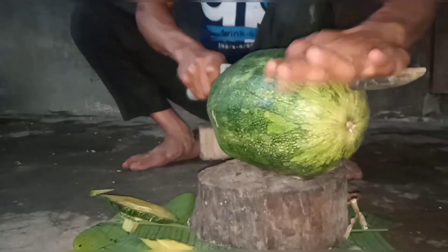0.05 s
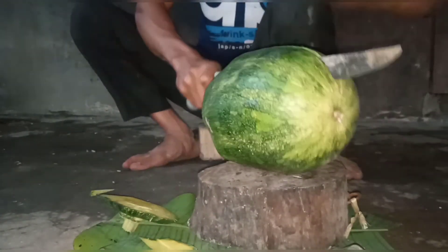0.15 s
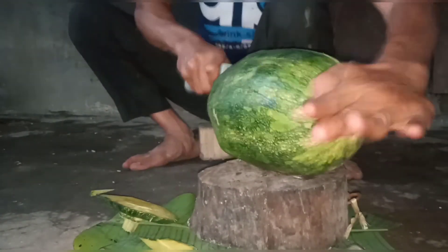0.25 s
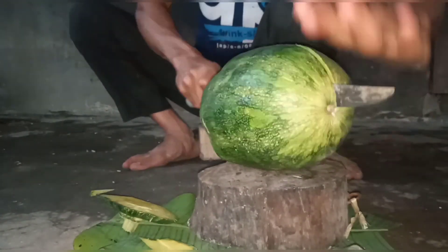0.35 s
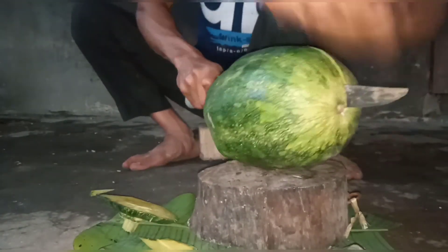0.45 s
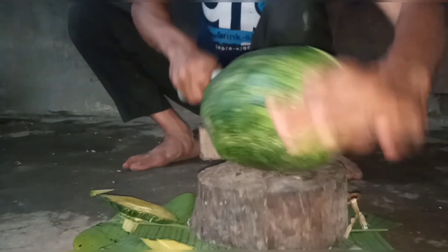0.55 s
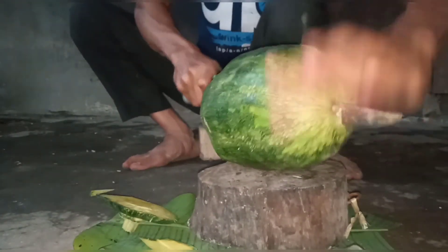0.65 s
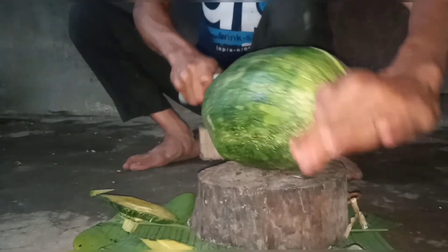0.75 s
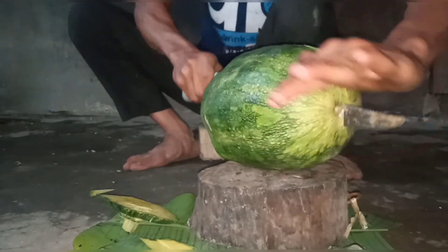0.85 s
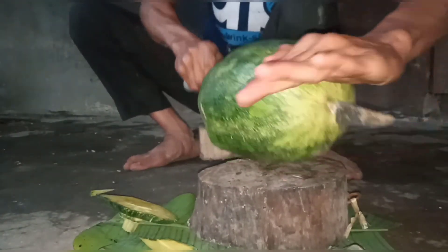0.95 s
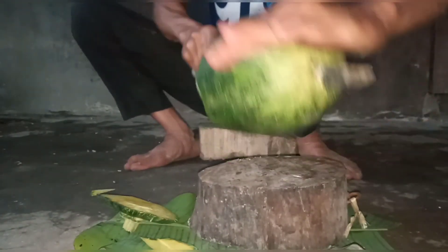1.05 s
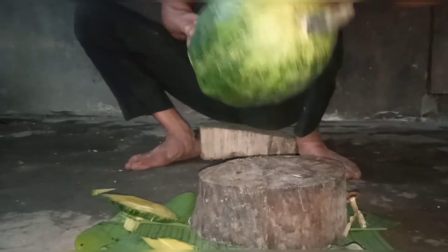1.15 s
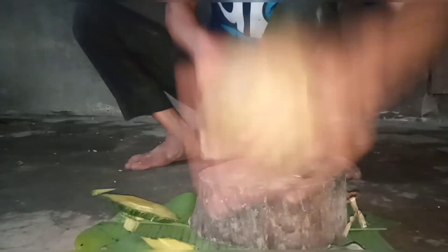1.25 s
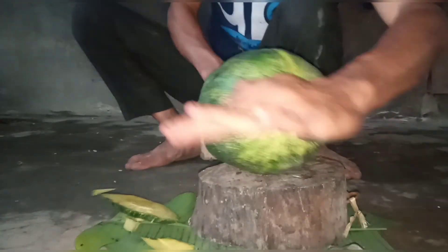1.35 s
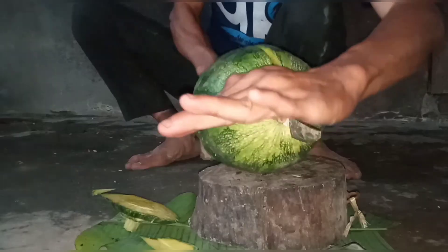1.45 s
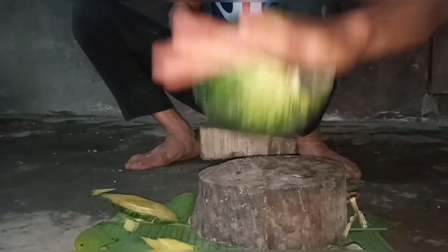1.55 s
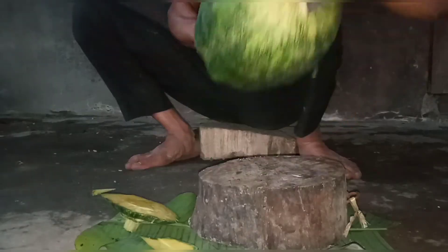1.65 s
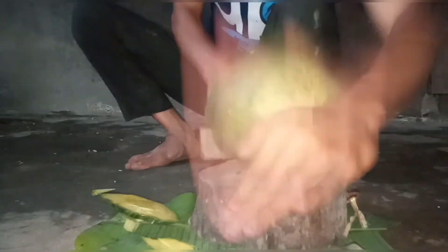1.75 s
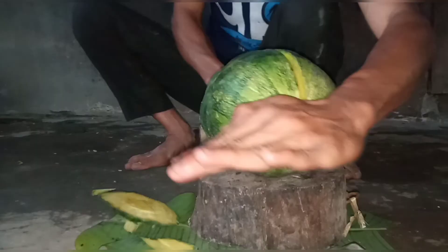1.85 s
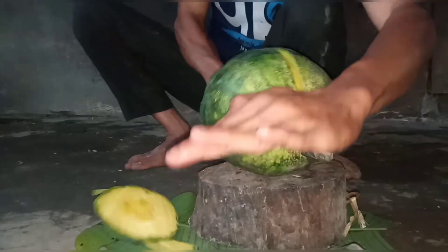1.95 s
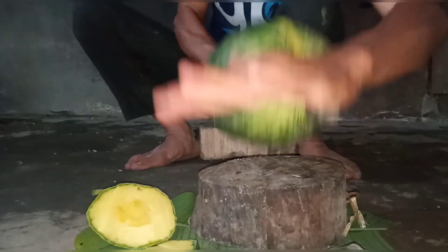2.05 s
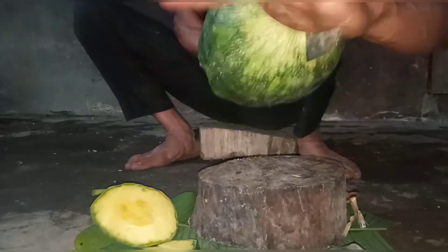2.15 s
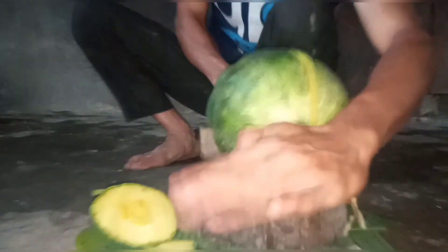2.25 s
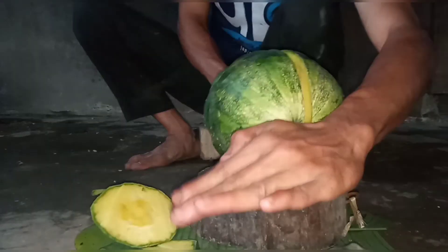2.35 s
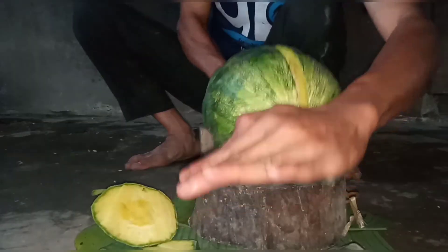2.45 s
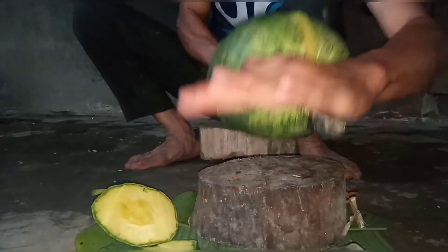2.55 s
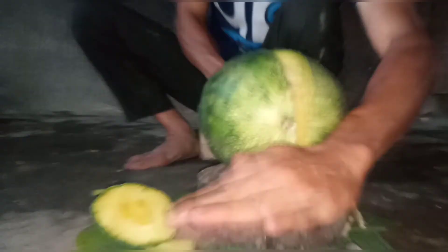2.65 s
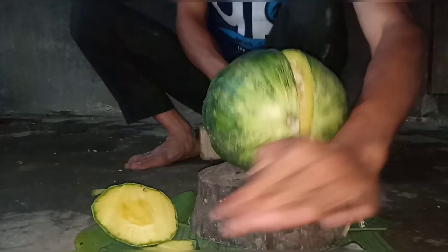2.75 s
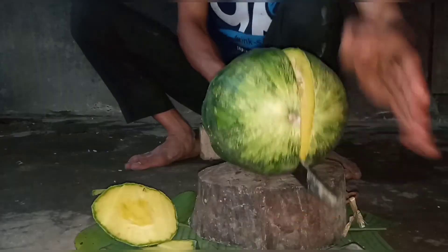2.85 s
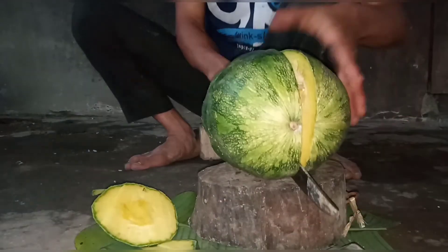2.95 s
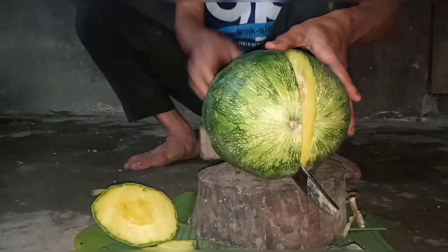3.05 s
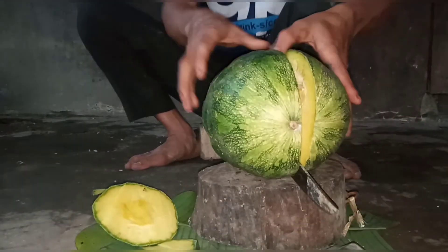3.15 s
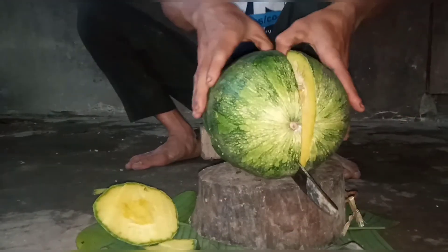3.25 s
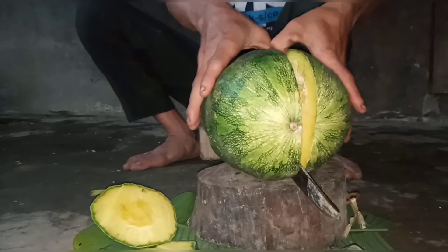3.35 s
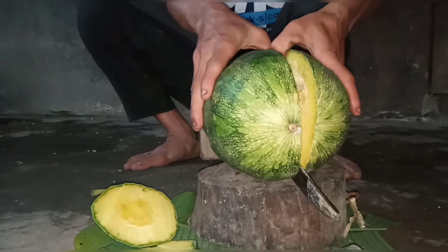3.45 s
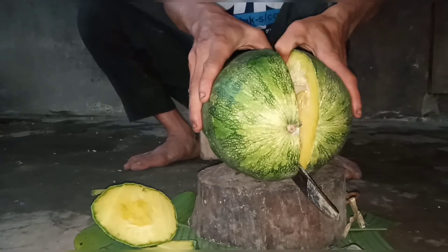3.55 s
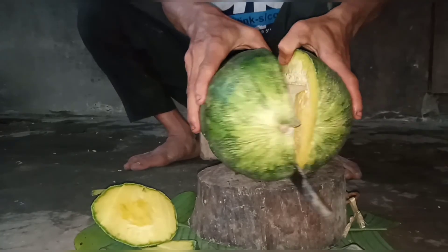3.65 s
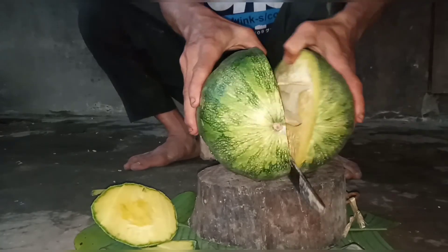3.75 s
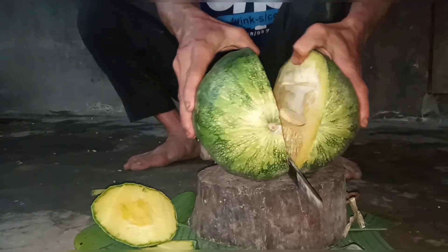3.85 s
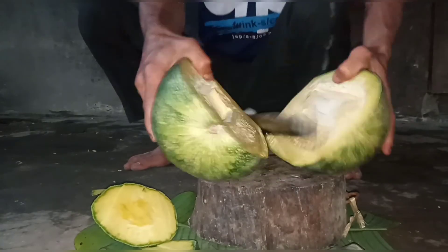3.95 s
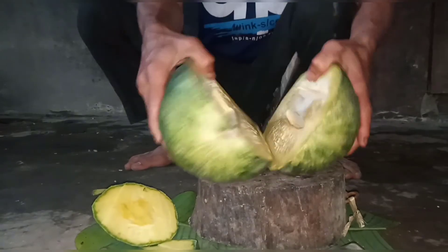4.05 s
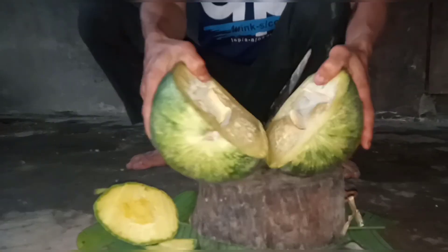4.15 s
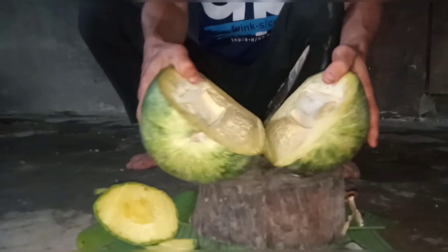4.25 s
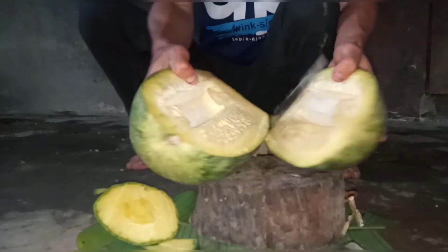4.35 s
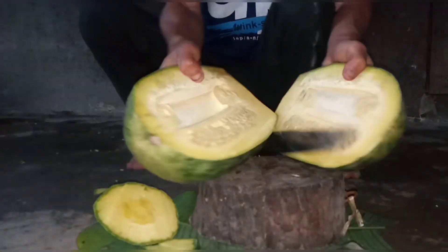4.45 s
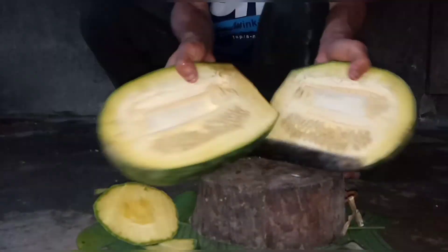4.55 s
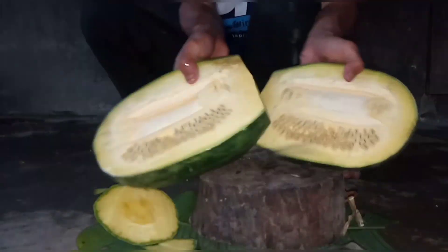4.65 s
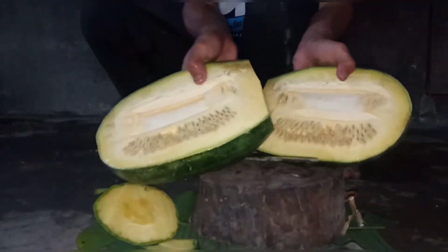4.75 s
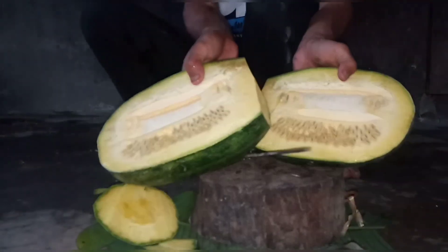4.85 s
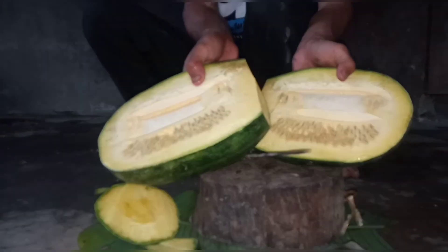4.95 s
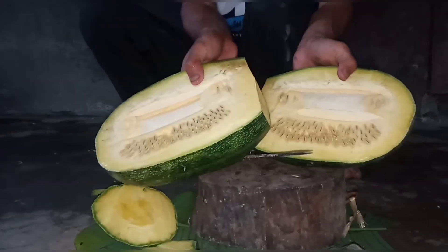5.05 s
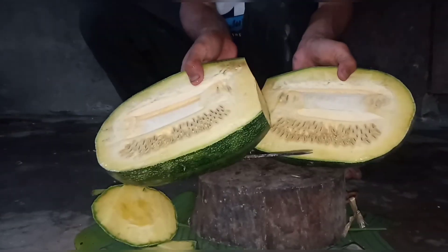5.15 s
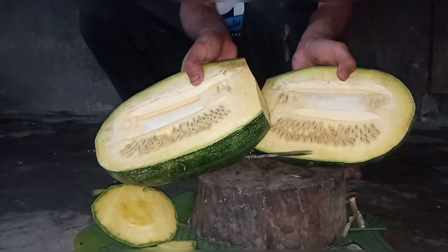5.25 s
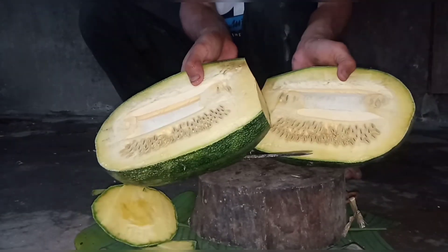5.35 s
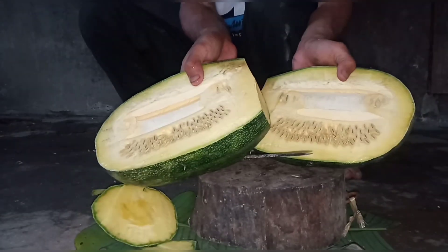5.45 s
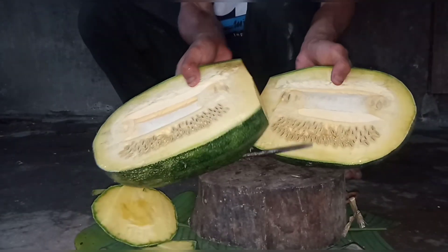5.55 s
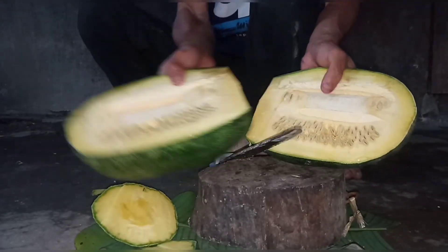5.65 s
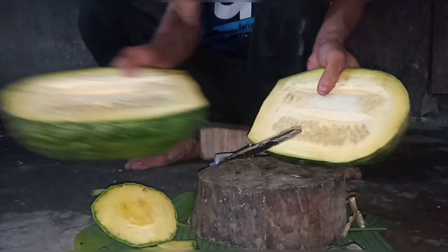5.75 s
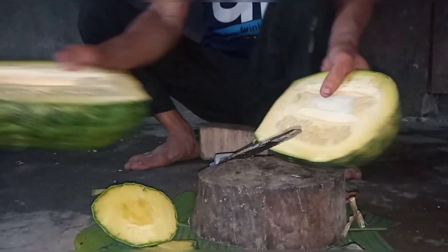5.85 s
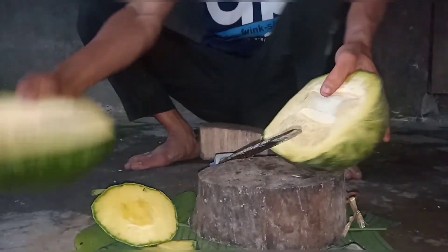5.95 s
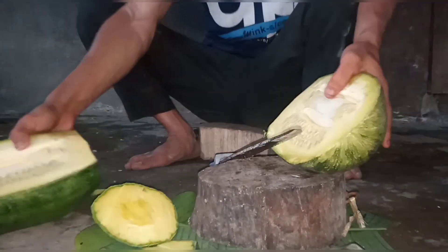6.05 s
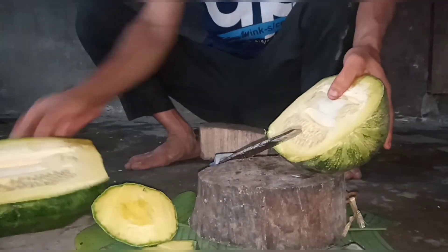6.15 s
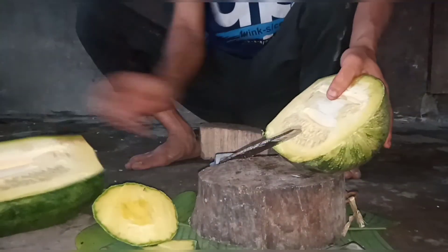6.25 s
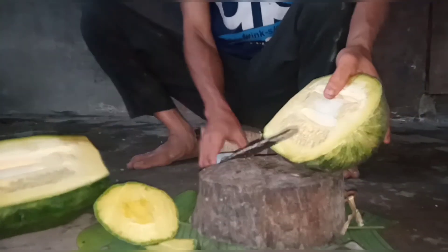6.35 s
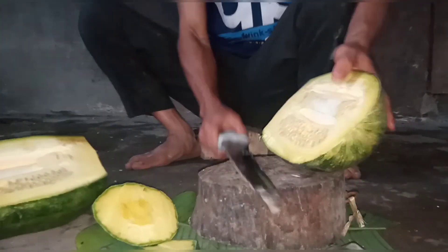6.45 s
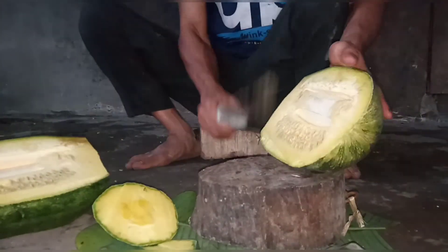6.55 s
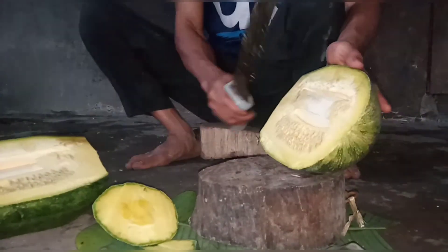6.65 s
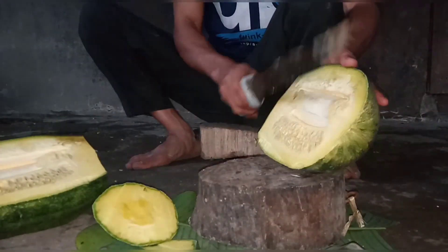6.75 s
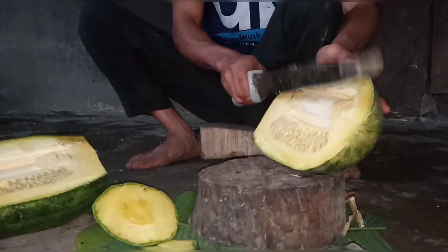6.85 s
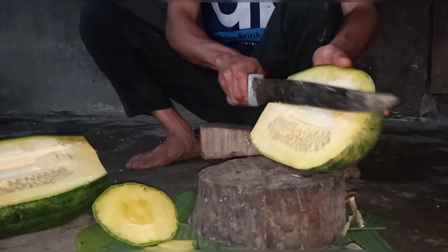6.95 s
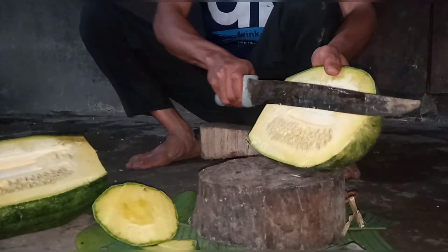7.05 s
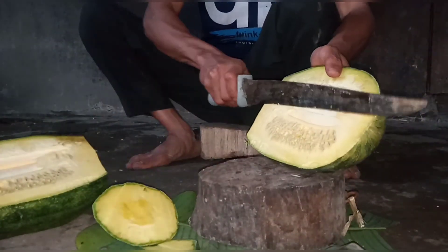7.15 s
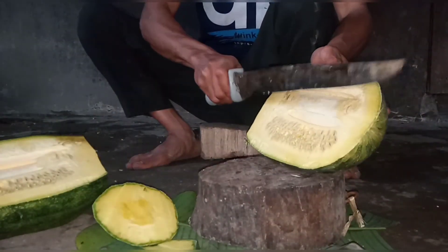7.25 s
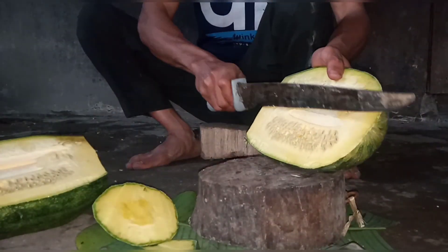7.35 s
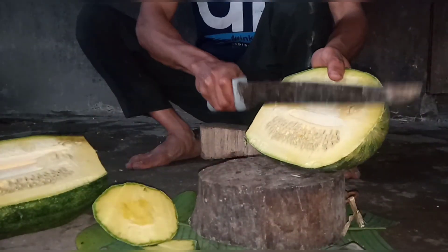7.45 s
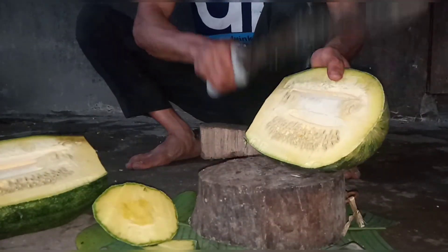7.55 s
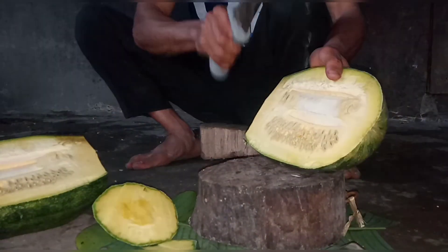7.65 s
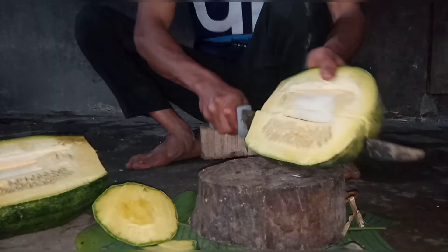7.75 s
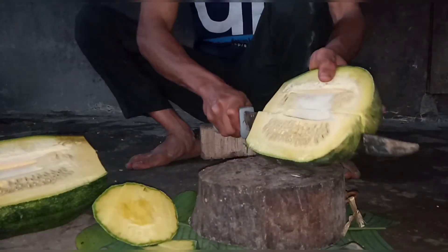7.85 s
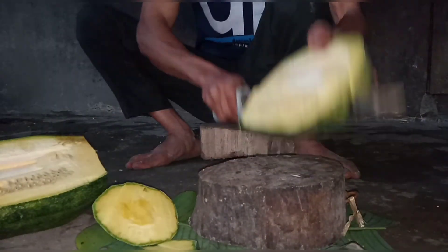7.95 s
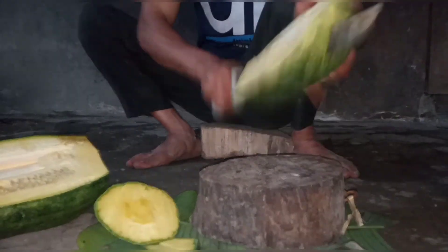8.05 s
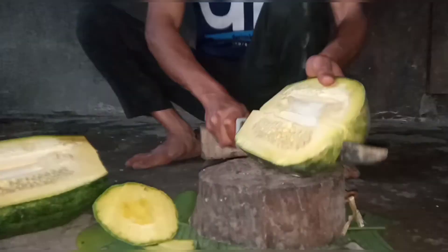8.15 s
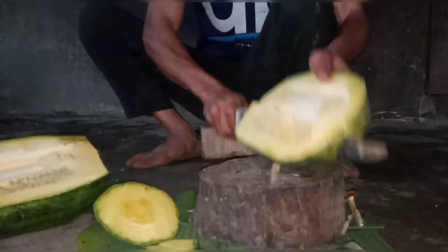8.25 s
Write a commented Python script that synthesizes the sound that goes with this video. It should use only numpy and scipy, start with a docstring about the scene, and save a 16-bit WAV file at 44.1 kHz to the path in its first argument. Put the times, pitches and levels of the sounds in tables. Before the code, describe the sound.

Close to the microphone, a big hard gourd with a machete wedged in it is pounded on a wooden stump: light bumps, then heavy hollow thuds with crisp tearing. It is pulled apart with a crack, the blade clatters briefly on wood, a half is set down, and pounding resumes. Behind, a motor recedes, a dog barks and a rooster crows far off.

```python
"""A big green gourd with a machete wedged in it is pounded on a stump until it cracks and is pulled in two.
The blade clatters onto the wood, one half is put down, and the other is chopped and pounded again.
Thuds are a heaving belly, ringing modes and a slap; cracks and palm rubs are showers of clicks; steel rings.
Close walls and a concrete floor answer with echoes and a short tail. Far off a motor (wavering tone and roar)
fades, a dog barks (pulses and noise) and a cock crows (two harmonics), over soft filtered air and hiss."""
import sys
import numpy as np
from scipy import signal
from scipy.fft import rfft, irfft
from scipy.io import wavfile
from scipy.ndimage import uniform_filter1d

SR = 44100
rng = np.random.default_rng(int(sys.argv[2]) if len(sys.argv) > 2 else 0)


def waveform_to_disk(signal):
    """Save audio, clipped to [-1, 1], as 16-bit WAV at the path in sys.argv[1]."""
    frames = np.transpose(np.atleast_2d(signal))
    scaled = np.clip(frames, -1, 1) * 32767
    samples = np.round(scaled).astype(np.int16)
    wavfile.write(sys.argv[1], SR, samples)


N = 366471
TIME = np.arange(N) / SR  # seconds
HIT = TIME[:SR // 4]  # the quarter second given to each short sound


def amp(db):
    """Decibels to gain."""
    return 10 ** (np.asarray(db) / 20)


def unit(x):
    """Scale to rms 1."""
    return x / np.sqrt(np.mean(x ** 2))


def noise(n=N):
    """White noise of spread 1."""
    return rng.standard_normal(n)


def add(track, start_s, sound):
    """Mix a sound in at its start time."""
    i = max(int(start_s * SR), 0)
    track[i:i + len(sound)] += sound[:N - i]


def level_curve(rows):
    """Level in dB, sample by sample, from rows of time in seconds and dB."""
    seconds, db = np.transpose(rows)
    return np.interp(TIME, seconds, db)


def colour(x, points, tilt=0, size=4096):
    """Causal filter of unit energy through (Hz, dB) points, tilted in dB per octave above the second point."""
    hz, db = np.transpose(points)
    octave = np.log2(np.maximum(np.fft.rfftfreq(size, 1 / SR), 1))
    shape_db = np.interp(octave, np.log2(hz), db)
    tilt_db = tilt * np.maximum(octave, np.log2(hz[1]))
    # folding the cepstrum forward gives minimum phase, so nothing sounds early
    cepstrum = irfft(np.log(amp(shape_db + tilt_db)))
    cepstrum[1:size // 2] *= 2
    cepstrum[size // 2 + 1:] = 0
    response = irfft(np.exp(rfft(cepstrum)))
    return signal.fftconvolve(x, response / np.linalg.norm(response))[:len(x)]


def walk(rate):
    """Slow chance with a spread of 1, drawn afresh this many times a second and smoothed."""
    k = int(SR / rate)
    steps = np.repeat(noise(N // k + 1), k)
    return unit(uniform_filter1d(steps, k)[:N])


def ring(modes, pitch=1):
    """Free decay of struck (Hz, dB, t60 s) modes; pitch multiplies every frequency."""
    out = np.zeros(len(HIT))
    for hz, db, t60 in modes:
        out += amp(db - 60 * HIT / t60) * np.sin(2 * np.pi * hz * pitch * HIT)
    return out


def swell(t, peak_s):
    """Envelope that rises to 1 at peak_s and dies away."""
    return (t / peak_s * np.exp(1 - t / peak_s)) ** 2


def burst(length_s, grain_db, grains_per_s):
    """A dying shower of tiny clicks of very uneven size; its energy follows the length alone."""
    fade = np.exp(-HIT / max(length_s, 1 / SR))
    uneven_db = grain_db * np.minimum(rng.exponential(size=len(HIT)), np.pi)
    sizes = noise(len(HIT)) * amp(uneven_db)
    clicks = sizes * (rng.random(len(HIT)) < grains_per_s / SR) * fade
    return clicks * np.linalg.norm(fade) / (np.linalg.norm(clicks) + 1e-12)


# The microphone's own hiss. Each row: frequency in Hz, relative level in dB.
HISS_COLOUR = [(1000, -6), (5400, 0), (5900, 5), (6200, 13), (6600, 6), (7500, 1), (9000, -3), (15000, -5)]


def hiss(level_db=-87):
    """The microphone's steady hiss: filtered white noise."""
    return amp(level_db) * colour(noise(), HISS_COLOUR)


# Open air around the yard. Each row: frequency in Hz, relative level in dB.
AIR_COLOUR = [(25, -31), (115, -1.5), (186, -12), (300, -31), (450, -35.5), (640, -14.5), (850, -19.5),
              (1200, -15.5), (2800, -24), (3900, -26.5), (5500, -52), (7000, -52), (9000, -66),
              (15000, -75)]
# How the open air comes and goes. Each row: time in seconds, relative level in dB.
AIR_SWAY = [(0.0, -59.5), (0.83, -62), (1.29, -61.5), (1.57, -64), (2.17, -61), (3.12, -61.5),
            (3.93, -58.5), (4.3, -61.5), (4.69, -58), (5.82, -61), (6.08, -57.5), (6.66, -59),
            (7.35, -66.5), (8.3, -60)]


def air(gain_db=3, flicker_db=1.0, mottle_db=4.0, smooth_hz=5000, size=512):
    """Soft outdoor background; it wavers as a whole and each narrow band flickers, less so in the treble."""
    hz, _, cells = signal.stft(noise(), SR, nperseg=size)
    across_bands = uniform_filter1d(noise(cells.shape), size=4, axis=0)
    patches = unit(uniform_filter1d(across_bands, size=10, axis=1))
    depth_db = mottle_db / np.hypot(1, (hz[:, None] / smooth_hz) ** 2)
    mottled = signal.istft(cells * amp(depth_db * patches), SR, nperseg=size)[1][:N]
    level_db = level_curve(AIR_SWAY) + gain_db + flicker_db * walk(9.7)
    return colour(unit(mottled), AIR_COLOUR) * amp(level_db)


# Dull roar of the far motor. Each row: frequency in Hz, relative level in dB.
ROAR_COLOUR = [(30, -40.5), (70, 1), (110, 13), (160, 4), (280, -4.5), (450, -8.5), (800, -15), (1600, -32),
               (4000, -43.5), (6000, -65.5)]
# The motor recedes from the microphone. Each row: time in seconds, relative level in dB.
MOTOR_FADE = [(0.0, -41.5), (1.31, -40.5), (1.52, -46.5), (2.15, -46.5), (3.0, -58), (4.04, -58),
              (6.98, -70), (8.3, -63)]


def motor(firing_hz=114.8, tone_db=-1, roar_db=-0.5, wander=0.03, drift=.04, flutter_db=3, second_db=-15):
    """A far engine: a wavering firing tone with a weak octave in a dull roar; both fade together."""
    # wander and drift are shares of the firing rate
    wavering_hz = firing_hz * (1 + wander * walk(30) + drift * walk(4))
    phase = 2 * np.pi * np.cumsum(wavering_hz) / SR
    harmonics = np.sin(phase) + amp(second_db) * np.sin(2 * phase)
    tone = unit(harmonics * amp(flutter_db * walk(8.1)))
    roar = colour(noise(), ROAR_COLOUR) * amp(1.7 * walk(14))
    return (amp(tone_db) * tone + amp(roar_db) * roar) * amp(level_curve(MOTOR_FADE))


# A dog far from the microphone. Each row: start in seconds, level in dB.
DOG_BARKS = [(3.352, -47), (3.666, -48.5), (4.474, -48.5), (4.96, -54), (5.309, -46)]
# The bark as it arrives. Each row: frequency in Hz, relative level in dB.
DOG_COLOUR = [(250, -56), (550, -1), (750, 0.5), (1050, -1), (1400, -9.5), (2200, -23), (4000, -73)]


def dog(pitch_hz=520, peak_s=0.034, hoarse=3.2):
    """Distant barks: voice pulses under strong noise, smeared by the way into a hoarse puff."""
    out = np.zeros(N)
    shape = swell(HIT, peak_s)
    # the pitch rises and falls with the loudness; one pulse for each cycle
    phase = np.cumsum(pitch_hz * (1.0 + 0.0994 * shape)) / SR
    pulses = unit(np.diff(np.floor(phase), prepend=0))
    for start_s, db in DOG_BARKS:
        voice = pulses + hoarse * noise(len(HIT))
        add(out, start_s, amp(db) * shape * unit(colour(voice, DOG_COLOUR)))
    return out


# A cock far from the microphone, note by note. Each row: start in seconds, length before the release in
# seconds, starting pitch in Hz, relative level of the fundamental in dB, relative level of the octave in dB.
CROW_NOTES = [(3.698, 0.048, 843, -66, -55), (3.788, .11, 846, -66, -56.5), (5.85, 0.12, 837, -72, -58),
              (6.069, 0.27, 792, -58.5, -58.5), (6.827, 0.25, 622, -60, -68)]


def cock(attack_s=0.017, release_s=.04, sag_per_s=0.047, waver=0.00405, flutter_db=2, hoarse=0.51):
    """Distant crowing: only a hoarse fundamental and its octave, wavering and sinking, carry this far."""
    out = np.zeros(N)
    wobble = 1 + waver * walk(81)
    flutter = amp(flutter_db * walk(25))
    rasp_sin, rasp_cos = walk(160), walk(160)
    for start_s, length_s, hz, low_db, octave_db in CROW_NOTES:
        t = TIME - start_s
        attack = np.clip(t / attack_s, 0, 1)
        release = np.clip((length_s - t) / release_s + 1, 0, 1)
        # each note sinks by sag_per_s, a share of its pitch per second
        phase = 2 * np.pi * np.cumsum(hz * (1 - sag_per_s * t) * wobble) / SR
        # the rasp of the throat spreads the fundamental into a band
        rasp = rasp_sin * np.sin(phase) + rasp_cos * np.cos(phase)
        low = amp(low_db) * (np.sin(phase) + hoarse * rasp)
        octave = amp(octave_db) * np.sin(2 * phase)
        out += attack * release * flutter * (low + octave)
    return out


# Hands shift on the skin of the fruit, the firmest grips.
# Each row: start in seconds, level in dB, time to peak in seconds.
GRIPS = [(.159, -46.5, 0.0044), (1.203, -46, 0.0096), (1.718, -50, 0.021), (2.066, -45.5, 0.0059),
         (2.127, -49, .022), (3.119, -54, .02), (3.308, -47.5, 0.0072), (3.656, -48.5, 0.0066),
         (4.165, -53.5, 0.0072), (4.958, -46.5, 0.0075), (6.330, -53.5, 0.018), (7.260, -53, 0.0073)]
# Palm on rind, close by. Each row: frequency in Hz, relative level in dB.
PALM_COLOUR = [(250, -22), (700, 2), (1400, 8.5), (2200, -3.5), (3700, -9.5), (5200, -36.5), (7000, -36.5),
               (10000, -44.5)]


def rubs(grain_db=3.5, count=10, light_db=-60, spread_db=1.5, light_peak_s=.015):
    """Palms slip on the rind in short, grainy rustles: a few firm grips, and light touches all along."""
    out = np.zeros(N)
    touches = list(GRIPS)
    # one light touch at a random moment in each equal stretch of time
    for k in range(count):
        start_s = (k + rng.random()) / count * N / SR
        touches.append((start_s, light_db + spread_db * rng.standard_normal(), light_peak_s))
    for start_s, db, peak_s in touches:
        rustle = unit(colour(burst(1, grain_db, 4000), PALM_COLOUR))
        add(out, start_s, amp(db) * swell(HIT, peak_s) * rustle)
    return out


# The blade knocks on the wood.
# Each row: start in seconds, relative ring level in dB, pitch ratio, relative level of the wooden clack in dB.
BLADE_KNOCKS = [(4.611, -21, 1.07, -16), (4.622, -27, 0.93, -20), (4.648, -22.5, 1.24, -13.5),
                (4.656, -15, 1.04, -13), (4.665, -20, 0.7, -17), (6.442, -12, 0.96, -32),
                (6.452, -14, 0.97, -17.5)]
# Ringing modes of the steel. Each row: frequency in Hz, relative level in dB, t60 in seconds.
BLADE_MODES = [(563, -16, 0.075), (1215, -5.5, 0.091), (1333, -12.5, 0.036), (1378, 7, 0.031),
               (1400, -17.5, 0.031), (2410, -14.5, 0.026), (2517, -12.5, 0.041), (3205, -14.5, 0.032),
               (3775, -23, 0.041)]
# The stump under the blade. Each row: frequency in Hz, relative level in dB.
CLACK_COLOUR = [(150, -3.5), (430, -3), (580, 4), (1000, -2), (1500, 0), (2250, -0.5), (3000, -12.5),
                (4300, -19.5), (5500, -38), (10000, -48.5)]


def clanks(contact_hz=5000, build_s=0.0017):
    """The steel bounces on the stump: short ringing modes, soon damped by the wood, and a woody clack."""
    out = np.zeros(N)
    # the ring builds up over a cycle or two as the bend runs along the blade
    build = 1 - np.exp(-HIT / build_s)
    for start_s, ring_db, pitch, clack_db in BLADE_KNOCKS:
        steel = amp(ring_db) * build * ring(BLADE_MODES, pitch)
        clack = amp(clack_db) * colour(burst(0.0027, 1.1, 8000), CLACK_COLOUR)
        add(out, start_s, 0.7 * steel + 0.55 * clack)
    # wet wood gives way, so the contact has no sharp edge
    return signal.sosfilt(signal.butter(2, contact_hz, fs=SR, output="sos"), out)


# The blade is driven into the fruit. Each row: start in seconds, relative bite level in dB, relative tear
# level in dB, tear decay in seconds, treble tilt in dB per octave, relative level of the rind snap in dB.
BITES = [(.003, -25.5, -28, 0.019, -1, -51), (0.225, -37, -36.5, 0.018, 2, -60),
         (.475, -44, -31.5, 0.0047, 3, -62), (1.264, -27, -21, 0.013, -3.5, -43),
         (1.754, -16.5, -17, 0.01, 0, -42), (2.222, -17.5, -20, 0.018, -2, -34),
         (2.618, -16.5, -9, 0.0024, 1, -23.5), (3.869, -10.5, -21.5, .011, 0, -14),
         (7.681, -20, -26.5, 0.0076, 5.5, -30), (8.061, -30, -20.5, .016, 0.5, -39)]
# Bursting flesh. Each row: frequency in Hz, relative level in dB.
CRUNCH_COLOUR = [(200, -7), (600, 9.5), (1300, 2), (2700, -0.5), (3700, -0.5), (4700, -14), (5500, -25.5),
                 (6700, -17), (9000, -34.5), (15000, -46.5)]
# Ringing modes of the hard rind. Each row: frequency in Hz, relative level in dB, t60 in seconds.
RIND_MODES = [(596.5, -2, 0.04), (1700, 1, 0.028), (2000, 1.5, 0.02), (2300, -1, 0.02), (3600, -11, .015),
              (4260, -17, .015)]


def cracks(bite_s=0.0046, tear_lag_s=.008):
    """The edge bites and rings the hard rind; just after, crisp cells burst in a quick run as the flesh tears."""
    out, rind = np.zeros(N), ring(RIND_MODES)
    for start_s, bite_db, tear_db, tear_s, tilt, snap_db in BITES:
        for lag_s, db, length_s in ((0, bite_db, bite_s), (tear_lag_s, tear_db, tear_s)):
            crunch = colour(burst(length_s, 1.7, 4500), CRUNCH_COLOUR, tilt)
            add(out, start_s + lag_s, 0.6 * amp(db) * crunch)
        add(out, start_s, .5 * amp(snap_db) * rind)
    return out


# Blows on the fruit and the stump. Each row: start in seconds, belly thump level in dB, belly pitch in Hz,
# relative knock level in dB, knock pitch ratio, relative slap level in dB,
# roll from rim to full weight in seconds.
BLOWS = [(.004, -23.5, 247, -27, 0.76, -52, 0.015), (0.2196, -22, 169, -28.5, 1.27, -26, 0.0026),
         (.468, -27.5, 148, -23.5, 0.77, -33.5, 0.009), (1.259, -9.5, 162, -9, 0.98, -16.5, 0.0054),
         (1.7558, -3, 171, -4.5, 1.04, -10, 0.00085), (2.2198, -17.5, 162, -2, 1.02, -8, 0.00022),
         (2.618, -19, 160, 0.5, 1.088, -16, 0.00068), (3.869, -28, 185, -19, 1.01, -36, 0.00071),
         (4.057, -27, 218, -31.5, 1.14, -44, 0.00089), (4.421, -32.5, 129, -34.5, 0.87, -40.5, 0.0068),
         (4.6098, -35, 118, -23.5, 0.748, -21.5, 0.0019), (4.649, -35, 151.4, -29, 1.76, -44, 0.0018),
         (5.647, -47, 255, -63, 0.63, -78, 0), (6.009, -19.5, 157, -20, 1.2, -18, 0.0013),
         (7.682, -26.5, 223, -25.5, 1.0, -16.5, 0.0094), (8.062, -12.5, 215, -18, 1.55, -7.5, 0.011)]
# Modes of gourd on stump. Each row: frequency in Hz, relative level in dB, t60 in seconds.
KNOCK_MODES = [(345, 3.5, 0.045), (405, -0.5, .035), (495.5, -2, 0.047), (673.4, -13, 0.14),
               (971, -29, 0.13), (1200, -23, .03), (1330, -19.5, 0.04), (1534, -14.5, 0.043)]
# Skin on wood. Each row: frequency in Hz, relative level in dB.
SLAP_COLOUR = [(25, -23.5), (100, 4), (280, 7), (600, 7.5), (1200, -0.5), (2000, -9.5), (3400, -20.5),
               (5200, -39), (9000, -56), (15000, -66)]


def thuds(boom_hz=60, boom_db=-25, boom_s=0.025, contact_s=0.001, swell_s=.004, rim_db=-4):
    """The hollow fruit heaves for a few cycles, knocks with the stump, and its skin slaps the wood."""
    out = np.zeros(N)
    for start_s, belly_db, belly_hz, knock_db, pitch, slap_db, roll_s in BLOWS:
        belly = amp(belly_db) * swell(HIT, swell_s) * np.sin(2 * np.pi * belly_hz * HIT)
        knock = -amp(knock_db) * ring(KNOCK_MODES, pitch) * (1 - np.exp(-HIT / contact_s))
        # the rim touches first, then the fruit rolls onto its full weight
        for lag_s, touch_db in ((0, rim_db), (roll_s, 0)):
            slap = amp(slap_db) * colour(burst(0.0052, 6.6, 9000), SLAP_COLOUR)
            add(out, start_s + lag_s, amp(touch_db) * (0.51 * knock + 0.76 * slap))
        # the weight of the blow sets off a late, deep boom between the walls
        weight = np.hypot(amp(belly_db), .4 * amp(knock_db))
        boom = amp(boom_db) * weight * swell(HIT, boom_s) * np.sin(2 * np.pi * boom_hz * HIT)
        add(out, start_s + roll_s, belly + boom)
    return out


# Nearby walls. Each row: delay in seconds, level against the direct sound in dB.
WALL_ECHOES = [(.0072, -21.5), (.0115, -21.5), (0.02, -21), (.027, -21.5)]
# Diffuse tail of the place. Each row: frequency in Hz, relative level in dB, t60 in seconds.
TAIL = [(60, 3, 0.23), (153.2, -8, .3), (398, -3.5, 0.23), (1190, -1.5, 0.24), (3500, -3, 0.26),
        (8000, -9, 0.26), (15000, -4, 0.22)]


def room(dry, build_s=0.01, wet_db=-3, size=512):
    """A few wall echoes and a short diffuse tail, noise whose decay time depends on frequency."""
    hz, db, t60 = np.transpose(TAIL)
    t = TIME[:SR // 2]
    bin_hz, frame_s, cells = signal.stft(noise(len(t)), SR, nperseg=size)
    db, t60 = (np.interp(np.log(bin_hz + 1), np.log(hz), c)[:, None] for c in (db, t60))
    decay = np.log(1000) / t60
    # the root gives each band the same energy whatever its decay
    fading = cells * amp(db) * np.exp(-decay * frame_s) * np.sqrt(2 * decay / SR)
    tail = signal.istft(fading, SR, nperseg=size)[1][:len(t)]
    response = amp(wet_db) * tail * (1 - np.exp(-(t / build_s) ** 2))
    response[0] += 1  # direct sound
    for delay_s, echo_db in WALL_ECHOES:
        add(response, delay_s, amp(np.array([echo_db])))
    return signal.fftconvolve(dry, response)[:N]


def scene():
    """The work at the stump between its walls, the distance behind it, and a steady trace of hiss."""
    distance = air() + motor() + dog() + cock()
    work = rubs() + clanks() + cracks() + thuds()
    return (hiss() + distance + room(work))[None]


def record(dry, top_hz=15600):
    """The microphone sheds the deepest bass and rounds the hardest peaks; the top is cut."""
    thinned = signal.sosfilt(signal.butter(1, 30, "highpass", fs=SR, output="sos"), dry)
    rounded = np.tanh(thinned)
    return signal.sosfilt(signal.ellip(8, .2, 70, top_hz, fs=SR, output="sos"), rounded)


dry = scene()
out = record(dry)
waveform_to_disk(out)
```